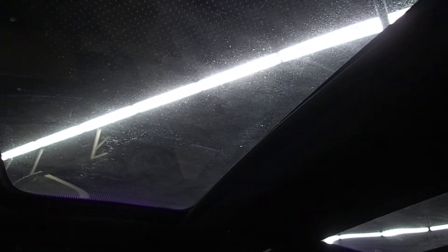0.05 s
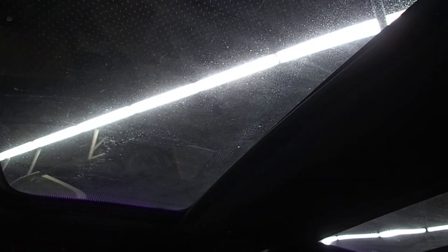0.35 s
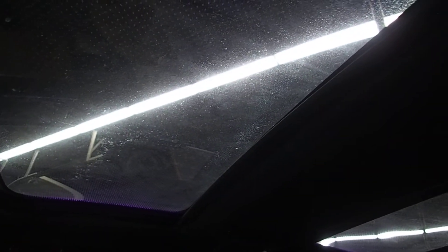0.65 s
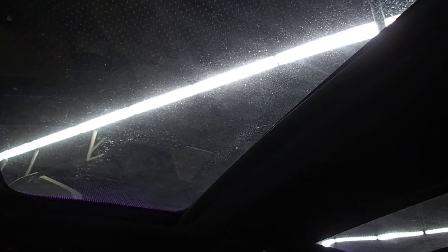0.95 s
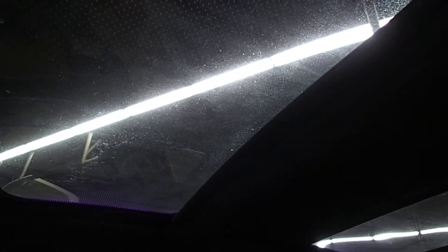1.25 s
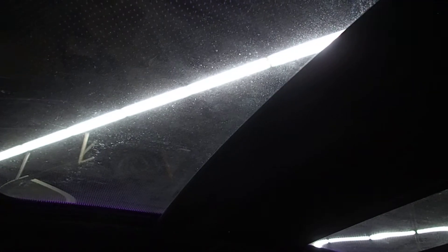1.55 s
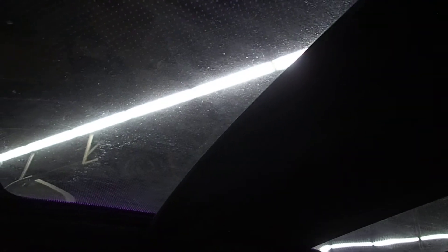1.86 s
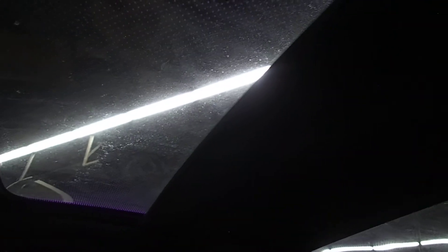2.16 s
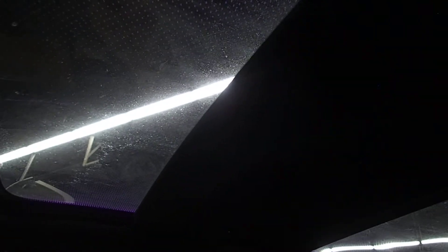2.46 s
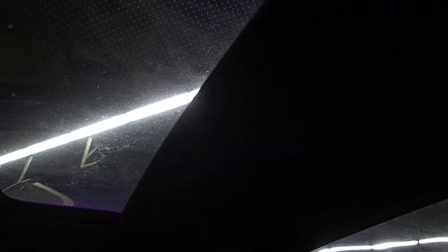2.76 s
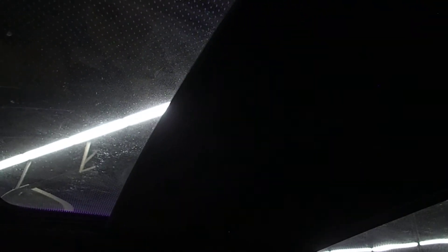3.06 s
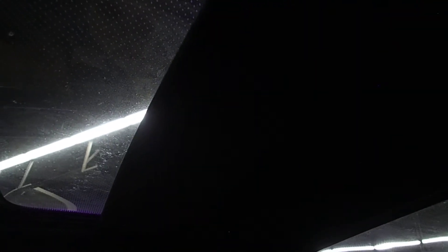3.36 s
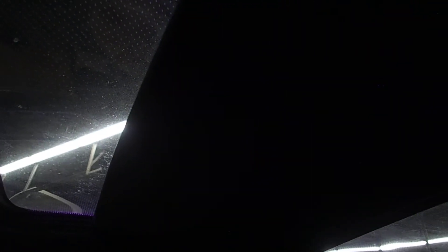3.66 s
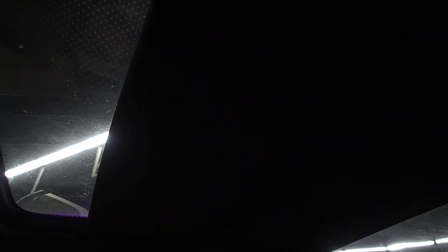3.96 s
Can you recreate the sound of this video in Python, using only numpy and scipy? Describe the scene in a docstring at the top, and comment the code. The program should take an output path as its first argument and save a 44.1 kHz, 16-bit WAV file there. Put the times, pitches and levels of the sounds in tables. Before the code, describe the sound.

A car sunroof motor whirs, heard from inside the parked car. At first there is only faint cabin rumble and hiss, with a low tone fading by 0.3 seconds. A switch thuds softly at 0.7 seconds. At 1.1 seconds a sharp click starts the motor, a thin whine over raspy gears that slows slightly and runs on to about 4 seconds. The panel ticks faintly at 3.5 seconds.

```python
"""A parked car's cabin rumbles and hisses faintly; a low tone fades in the first 0.3 s.
At 0.7 s the roof switch is pressed with a soft thud. At 1.1 s a relay snaps and the sunroof motor
starts: a thin whine over the rasp of brushes and gears, sagging a little in speed as the panel slides.
At 3.5 s the panel ticks once on its rail. A small stereo microphone colours it all."""
import sys
import numpy as np
from scipy import signal
from scipy.fft import rfft, irfft
from scipy.io import wavfile

SR = 44100
rng = np.random.default_rng(int(sys.argv[2]) if len(sys.argv) > 2 else 0)


def transcribe(signal):
    """Save signal, clipped to [-1, 1], as a 16-bit WAV file at the path in sys.argv[1]."""
    frames = np.atleast_2d(signal).T
    limited = np.clip(frames, -1, 1)
    pcm = np.round(limited * 32767).astype(np.int16)
    wavfile.write(sys.argv[1], SR, pcm)


N = 176400
TIME = np.arange(N) / SR
CABIN_PAN_DB, MOTOR_PAN_DB = -3.5, -3


def from_db(db):
    """Decibels to gain."""
    return 10 ** (np.asarray(db) / 20)


def unit_rms(x):
    """Scale to unit power."""
    return x / np.sqrt(np.mean(x ** 2) + 1e-20)


def in_time(rows):
    """Breakpoints to a per-sample curve."""
    return np.interp(TIME, *np.transpose(rows))


def at_hz(rows, hz):
    """Interpolate on a log-frequency axis."""
    row_hz, value = np.transpose(rows)
    return np.interp(np.log(hz + 1), np.log(row_hz), value)


def pan(db):
    """Stereo gains, left over right by db."""
    return from_db(np.array([[db], [-db]]) / 2)


def drift(rate_hz):
    """Low-passed random wander, unit RMS."""
    hz = np.fft.rfftfreq(N, 1 / SR)
    return unit_rms(irfft(rfft(rng.standard_normal(N)) / (1 + (hz / rate_hz) ** 2), N))


def noise(spectrum, correlation):
    """Coloured stereo noise, unit RMS; left-right correlation is a number or a table over frequency."""
    hz = np.fft.rfftfreq(N, 1 / SR)
    alike = np.clip(at_hz(correlation, hz) if np.ndim(correlation) else correlation, 0, .995)
    mid, side = rfft(rng.standard_normal((2, N))) * from_db(at_hz(spectrum, hz))
    return unit_rms(irfft(np.sqrt(1 + alike) * mid + np.sqrt(1 - alike) * side * [[1], [-1]], N))


def narrow_noise(angle, width_hz):
    """A tone wandering in strength and phase fills a narrow band."""
    return unit_rms(drift(width_hz / 2) * np.cos(angle) + drift(width_hz / 2) * np.sin(angle))


def ring(x, hz, t60_s):
    """Resonator: a unit click starts a decaying sine of height 1."""
    r, w = np.exp(-np.log(1000) / (t60_s * SR)), 2 * np.pi * hz / SR
    return signal.lfilter([0, np.sin(w)], [1, -2 * r * np.cos(w), r * r], x + 1e-18)


def bell(x, hz, width_hz, db):
    """Lift or cut one band."""
    w, g = 2 * np.pi * hz / SR, from_db(db / 2)
    k = np.sin(w) * width_hz / hz / 2
    centre = -2 * np.cos(w)
    return signal.lfilter([1 + k * g, centre, 1 - k * g], [1 + k / g, centre, 1 - k / g], x)


def strike(times_s, levels_db, modes):
    """Blows on a body that rings in its modes."""
    clicks = np.zeros(N)
    clicks[(np.asarray(times_s) * SR).astype(int)] = from_db(levels_db)
    return sum(from_db(db) * ring(clicks, hz, t60_s) for hz, db, t60_s in modes)


def bursts(times_s, levels_db, spectrum, t60_s, tail_db=-13, tail_t60_s=.23):
    """Dense, quickly dying ring of trim after each contact, with a short cabin tail."""
    age_s = TIME - np.asarray(times_s)[:, None]
    fall = -np.log(1000) * np.maximum(age_s, 0)
    envelopes = (age_s >= 0) * (np.exp(fall / t60_s) + from_db(tail_db) * np.exp(fall / tail_t60_s))
    power = from_db(levels_db) ** 2 @ envelopes ** 2
    return np.sqrt(power) * noise(spectrum, correlation=.74)


def hiss(level_db=-56.5):
    """Faint steady hiss, independent left and right."""
    # Each row: frequency in Hz, relative density in dB.
    spectrum = [(1000, 5.5), (2200, -7), (4000, -8), (5200, -3.5), (6500, -0.5), (8000, 6), (9300, -1),
                (12000, -4.5), (15500, -5.5)]
    return pan(db=1.5) * from_db(level_db) * noise(spectrum, correlation=0)


def fading_tone(hz=312, level_db=-49, end_s=.29, release_s=.14):
    """A low sine that holds briefly and dies away."""
    fade = np.clip((end_s - TIME) / release_s, 0, 1)
    return pan(CABIN_PAN_DB) * from_db(level_db) * fade * np.sqrt(2) * np.sin(2 * np.pi * hz * TIME)


def cabin(rumble_db=-45.5):
    """Outside rumble booms in the cabin's air modes."""
    # Each row: frequency in Hz, width in Hz, level in dB.
    air_modes = [(99.34, 15.7, -48.5), (118.64, 11.4, -46), (156.2, 9.3, -47.5), (207.2, 19.4, -52.5)]
    # Each row: time in seconds, gain in dB.
    boom_swell = [(0, -1), (.9, 0.5), (1.4, -1), (1.9, -2.5), (2.3, 1), (2.65, -2.5), (3.15, 2),
                  (3.35, -0.5), (3.7, 2), (3.95, -0.5)]
    # Each row: frequency in Hz, relative density in dB.
    spectrum = [(20, 7), (35, -22), (54, 2.5), (70, -9.5), (95, -2.5), (130, 4), (185, -4), (270, -4.5),
                (360, -10), (500, -12.5), (750, -17), (1400, -20.5), (2600, -34), (5000, -35)]
    # Each row: frequency in Hz, left-right correlation.
    correlation = [(30, 0.77), (100, 1), (250, 0.91), (400, 0.78), (650, 0.51), (2000, 0.35)]
    boom = sum(from_db(db) * narrow_noise(2 * np.pi * hz * TIME, width) for hz, width, db in air_modes)
    rumble = from_db(rumble_db) * noise(spectrum, correlation)
    return pan(CABIN_PAN_DB) * (rumble + from_db(in_time(boom_swell)) * boom)


def rail():
    """The sliding panel ticks once on its rail."""
    # Each row: frequency in Hz, relative density in dB.
    spectrum = [(3500, -22), (4900, -3), (6100, -3), (6800, -18), (12000, -30)]
    return bursts(times_s=[3.524], levels_db=[-45], spectrum=spectrum, t60_s=.017)


def switch():
    """The switch ticks and thuds in the roof lining."""
    # Each row: start in seconds, tick in dB, thud in dB.
    contacts = [(0.716, -50.5, -50), (.748, -43.5, -44), (0.7543, -44.5, -26.5)]
    # Each row: frequency in Hz, relative density in dB.
    tick_spectrum = [(200, 2), (700, 1), (1300, 4), (2200, -15), (3100, 0.5), (4400, 0), (5200, -6),
                     (6300, 3), (7300, -13), (15000, -27)]
    # Each row: frequency in Hz, gain in dB, T60 in seconds.
    thud_modes = [(167, -1.5, 0.13), (255, -6.5, 0.072), (360, -11, .06), (480, -19, .06),
                  (623, -18, 0.057)]
    times_s, tick_db, thud_db = np.transpose(contacts)
    tick = bursts(times_s, tick_db, tick_spectrum, t60_s=.034)
    return tick + pan(CABIN_PAN_DB) * strike(times_s, thud_db, thud_modes)


def relay():
    """The relay snaps shut; the drive takes up slack, knocks on its housing and jolts the panel."""
    # Each row: start in seconds, tick in dB, knock in dB.
    snaps = [(1.0875, -42, -64), (1.0889, -34, -55), (1.0923, -36, -32), (1.1205, -50, -40.5)]
    # Each row: frequency in Hz, relative density in dB.
    tick_spectrum = [(1000, 2), (3000, -14.5), (3800, 3.5), (4700, -2), (5500, 3), (6100, 6), (6800, -10.5),
                     (8300, -1.5), (11000, -15), (15000, -21)]
    knock_spectrum = [(50, -2), (200, 4), (450, 8), (700, 3), (950, 2), (1500, 3), (2200, -5), (3000, -14),
                      (8000, -35)]
    # Each row: frequency in Hz, gain in dB, T60 in seconds.
    relay_modes = [(5440, -5, 0.038), (6050, -9, .03)]
    drive_modes = [(201.6, -1, .28), (312, -2.5, 0.11), (540, -10, .06), (939, -4, 0.092),
                   (1286, -8.5, .05)]
    jolt_hz, jolt_t60_s = 45, .28
    times_s, tick_db, knock_db = np.transpose(snaps)
    tick = bursts(times_s, tick_db, tick_spectrum, t60_s=.029) + strike(times_s, tick_db, relay_modes)
    knock = bursts(times_s, knock_db, knock_spectrum, t60_s=.045)
    knock += strike(times_s, knock_db, drive_modes)
    jolt = strike(times_s=[1.118], levels_db=[-45], modes=[(jolt_hz, 0, jolt_t60_s)])
    return tick + pan(MOTOR_PAN_DB) * (knock + jolt)


def brushes(angle, hum_order, pulse_depth=.1, flutter_db=.64):
    """Brushes sizzle; the commutator sings in rough bands that follow the speed."""
    # Each row: frequency in Hz, relative density in dB.
    spectrum = [(1500, -25), (3000, -13), (3900, -14), (4500, -1), (5400, -3), (6100, -3), (6600, -8),
                (8000, -9), (9500, -17), (15000, -23)]
    # Each row: frequency in Hz, left-right correlation.
    correlation = [(3000, 0.87), (6000, 0.44), (6600, 0.74), (9000, 0.067)]
    # Each row: time in seconds, level in dB.
    level = [(1.1, -54), (1.22, -56.5), (1.38, -53.5), (2.0, -53), (2.85, -53.5), (3.3, -55.5),
             (4.0, -53.5)]
    # Each row: cycles per turn before rounding, width in Hz, level in dB relative to the sizzle.
    bands = [(90.4, 30, -12), (99.65, 260, -6.5)]
    sparking = (1 + pulse_depth * np.cos(hum_order * angle)) * from_db(flutter_db * drift(rate_hz=90))
    singing = sum(from_db(db) * narrow_noise(np.round(k) * angle, width) for k, width, db in bands)
    sizzle = unit_rms(sparking * noise(spectrum, correlation))
    return from_db(in_time(level)) * (sizzle + singing)


def gears(angle, age_s, start_db=-48, easing_db_per_s=.5, flutter_db=.07):
    """Gear rasp pulses within each turn and softens as the panel travels."""
    # Each row: frequency in Hz, relative density in dB.
    spectrum = [(40, -18), (90, 10.5), (250, 6), (400, 0), (560, -4.5), (800, -3), (1150, -2.5),
                (1400, -3.5), (1680, -1.5), (2100, -13.5), (2600, -15.5), (4000, -16.5), (8000, -58)]
    # Each row: pulses per turn, depth.
    pulse_orders = [(1, 0.07), (2, 0.05), (7, 0.21), (10, 0.21), (12, 0.047), (14, 0.081)]
    pulses = 1 + sum(depth * np.cos(k * angle) for k, depth in pulse_orders)
    level_db = start_db - easing_db_per_s * age_s - flutter_db * drift(rate_hz=14)
    return from_db(level_db) * unit_rms(pulses * noise(spectrum, correlation=.96))


def armature(angle, whine_order, hum_order, flutter_db=1.05, hum_flutter_db=1.5):
    """Harmonics of the turn rate: the whine firms up and the hum grows under load."""
    # Each row: cycles per turn, level in dB.
    harmonics = [(1, -61.5), (3, -52), (8, -64.5), (9, -64), (11, -65), (13, -65), (16, -76), (17, -72),
                 (18, -67.5), (19, -67.5), (21, -76), (34, -68)]
    # Each row: time in seconds, level in dB.
    whine_level = [(1.1, -58), (1.7, -54.5), (2.8, -53.5), (4.0, -53)]
    hum_level = [(1.1, -60.5), (2.4, -59), (2.8, -55.5), (4.0, -55.5)]
    hum_db = in_time(hum_level) + hum_flutter_db * drift(rate_hz=25)
    tones = np.zeros(N)
    for order, db in harmonics + [(whine_order, in_time(whine_level)), (hum_order, hum_db)]:
        amplitude = np.sqrt(2) * from_db(db + flutter_db * drift(rate_hz=7.6))
        tones += amplitude * np.sin(order * angle + 2 * np.pi * rng.random())
    return tones


def motor(start_s=1.095, spin_up_s=.018, start_sag=.3, jitter=.0015):
    """The motor spins up, then slows a little; tones, gears and brushes follow its shaft angle."""
    # Each row: time in seconds, nominal whine pitch in Hz.
    whine_pitch = [(1.15, 1087), (1.36, 1089), (2.33, 1092), (2.45, 1076), (3.07, 1068), (3.38, 1062),
                   (3.97, 1050)]
    whine_order, hum_order = 20, 10  # cycles per turn
    age_s = TIME - start_s
    running = 1 - np.exp(-np.maximum(age_s, 0) / spin_up_s)
    speed_ratio = (1 - start_sag * (1 - running)) * (1 + jitter * drift(rate_hz=15.5))
    turn_hz = in_time(whine_pitch) / whine_order * speed_ratio
    angle = 2 * np.pi * np.cumsum(turn_hz) / SR
    drive = armature(angle, whine_order, hum_order) + gears(angle, age_s)
    return running * (pan(MOTOR_PAN_DB) * drive + pan(db=-1) * brushes(angle, hum_order))


def scene():
    """Cabin background, then switch, relay, motor and rail."""
    return cabin() + fading_tone() + hiss() + switch() + relay() + motor() + rail()


def record(dry, low_cut_hz=23, high_cut_hz=15800):
    """Each microphone port rings, narrow bands dip or lift, deep bass and top are cut."""
    # Each row: resonance in Hz, width in Hz, gain in dB; left port, then right.
    ports = [(5170, 1350, 9), (4685, 1120, 9)]
    # Each row: centre in Hz, width in Hz, gain in dB.
    colour = [(1878, 82, -13), (2160, 260, 3), (2600, 500, -3), (3090, 300, 3.5), (3425, 190, -7),
              (4023, 540, -8.5)]
    x = np.array([bell(channel, *port) for channel, port in zip(dry, ports)])
    for band in colour:
        x = bell(x, *band)
    x = bell(x, hz=4825, width_hz=39, db=-22)
    x = signal.sosfilt(signal.butter(2, low_cut_hz, "high", fs=SR, output="sos"), x)
    return signal.sosfilt(signal.ellip(12, .1, 80, high_cut_hz, fs=SR, output="sos"), x)


dry = scene()
out = record(dry)
transcribe(out)
```